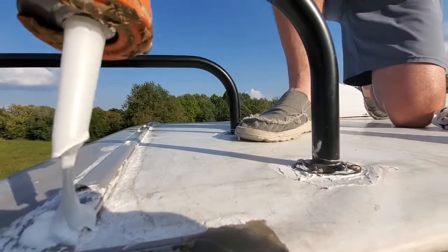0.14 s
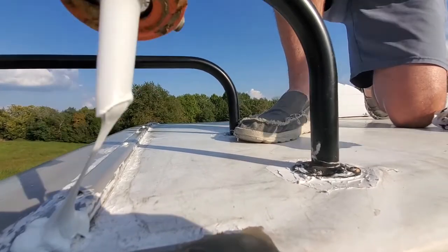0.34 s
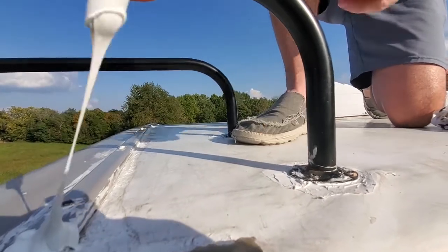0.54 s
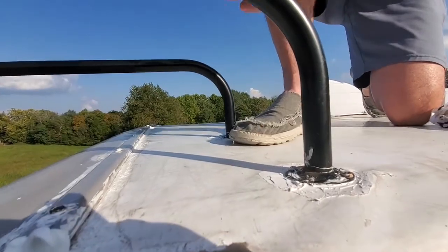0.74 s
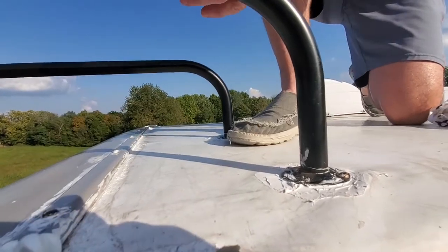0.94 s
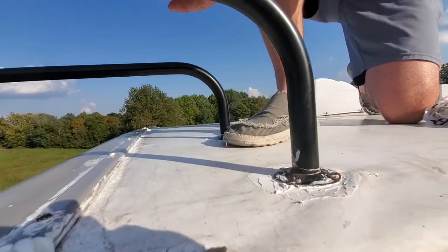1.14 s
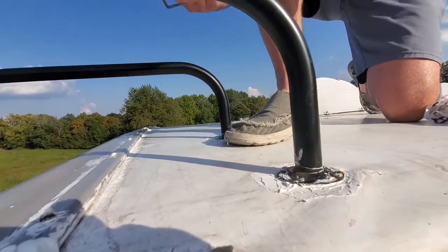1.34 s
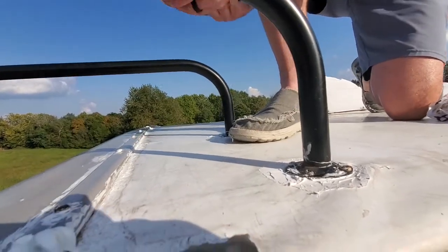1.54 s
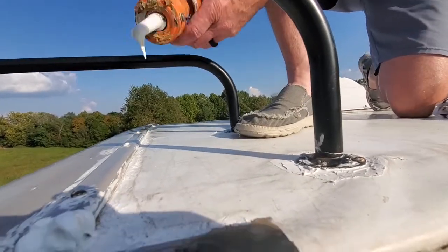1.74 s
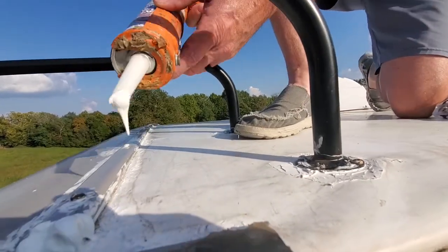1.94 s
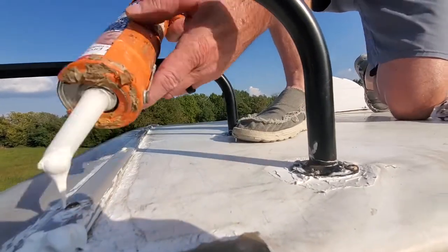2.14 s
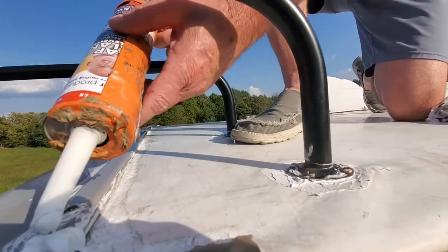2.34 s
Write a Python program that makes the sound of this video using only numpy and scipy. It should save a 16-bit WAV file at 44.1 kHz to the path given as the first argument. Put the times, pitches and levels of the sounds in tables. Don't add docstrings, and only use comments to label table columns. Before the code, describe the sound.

A caulking gun gives two quick metallic clicks close to the microphone, the hollow roof booming under the first; then cloth rubs, loose parts chatter and shoes knock the roof, over faint insects and a distant motor hum.

```python
import sys
import numpy as np
from scipy import signal
from scipy.fft import rfft, irfft, next_fast_len
from scipy.io import wavfile
from scipy.ndimage import uniform_filter1d, map_coordinates

SR = 44100
rng = np.random.default_rng(int(sys.argv[2]) if len(sys.argv) > 2 else 0)


def file_out(sig):
    cols = np.atleast_2d(sig).T
    lim = np.clip(cols, -1, 1)
    pcm = np.round(lim * 32767).astype(np.int16)
    wavfile.write(sys.argv[1], SR, pcm)


def boost_factor(decibels):
    exponent = np.asarray(decibels, float) / 20
    return 10 ** exponent


N = 105840
T = np.arange(N) / SR

# (frequency [Hz], level [dB], t60 [s])
ROOF_MODES = [(105, -12, .2), (172, -14, .2), (226, 0, .085), (262, -3, .1), (375, -12, .07)]
# (frequency [Hz], width [Hz], level [dB])
PANEL_MODES = [(488, 79, 2), (810, 129, 1.5), (1122, 150, -4), (1800, 235, -10), (2300, 210, -6.5),
               (3056, 220, -10), (4150, 190, -6), (6000, 350, -7.5)]
EVEN_DB = 0.5


def unit(x):
    return x / np.sqrt(np.mean(x ** 2) + 1e-20)


def along(points, hz):
    f, v = np.transpose(points)
    return np.interp(np.log(hz + 1), np.log(f + 1), v)


def curves(rows):
    s, *columns = np.transpose(rows)
    return [np.interp(T, s, column) for column in columns]


def wobble(rate):
    knots = rng.standard_normal(int(N * rate / SR) + 4)
    return map_coordinates(knots, [T * rate])


def filtered(x, response):
    n = x.shape[-1]
    m = next_fast_len(n + SR // 4)
    return irfft(rfft(x, m) * response(np.fft.rfftfreq(m, 1 / SR)), m)[..., :n]


def peaks(rows):
    def response(f):
        return sum((-1) ** k * boost_factor(db) * 1j * f * width / (hz * hz - f * f + 1j * f * width)
                   for k, (hz, width, db) in enumerate(rows))
    return response


def lowpass(width_hz):
    return lambda f: 1 / (1 + (f / width_hz) ** 2)


def pair(n, alike):
    a, b = rng.standard_normal((2, n))
    u = np.arccos(np.clip(alike, -1, 1)) / 2
    shared, apart = np.cos(u) * a, np.sin(u) * b
    return np.array([shared + apart, shared - apart])


def pan(db):
    return boost_factor([[db / 2], [-db / 2]])


def coloured(x, spectrum):
    return unit(filtered(x, lambda f: boost_factor(along(spectrum, f))))


def patchy(x, depth_db, wide, long):
    z = signal.stft(x, nperseg=512)[2]
    field = uniform_filter1d(rng.standard_normal(z.shape[1:]), size=wide, axis=0)
    field = uniform_filter1d(field, size=long, axis=1)
    return signal.istft(z * boost_factor(depth_db * unit(field)), nperseg=512)[1][:, :N]


def ring(modes, t, scatter_db, turns=1):
    y = 0
    for hz, db, t60 in modes:
        decay = boost_factor(db + scatter_db * rng.standard_normal() - 60 * t / t60)
        y = y + decay * np.sin(2 * np.pi * (hz * t + turns * rng.random()))
    return y / np.abs(y).max()


def later(y, lag_s):
    return np.array([y, np.pad(y, (round(lag_s * SR), 0))[:len(y)]])


def add(out, s, y):
    i = round(s * SR)
    out[:, i:i + y.shape[1]] += y[:, :out.shape[1] - i]


def motor():
    # (time [s], level [dB])
    hum_levels = [(0.0, -48.5), (0.02, -56), (0.95, -56.5), (1.2, -67.5), (1.24, -68), (1.32, -66),
                  (1.82, -64.5), (2.0, -55), (2.38, -62.5), (2.4, -70)]
    # (frequency [Hz], width [Hz], level [dB])
    drone_bands = [(52.7, 19, -64.5), (63, 35, -73.5), (78, 6.4, -62.5), (103.3, 19.5, -64.5),
                   (190.9, 14.8, -64), (281.5, 14, -73.5), (324, 16, -82.5)]
    # (frequency [Hz], density [dB per Hz])
    rumble_spectrum = [(12, -35), (28, -15), (49, -15), (118, -7.5), (157, -7), (203, -10.5), (292, -12.5),
                       (500, -37), (650, -78), (1100, -120)]
    level_db, = curves(hum_levels)
    level = np.sqrt(2) * boost_factor(level_db + 0.61 * wobble(7.25))
    hz = 123 + 1.31 * wobble(8.24)
    hum = level * np.sin(2 * np.pi * np.cumsum(hz) / SR)
    drones = np.zeros((2, N))
    for centre_hz, width_hz, db in drone_bands:
        resonance = peaks([(centre_hz, width_hz, 0)])
        drones += boost_factor(db) * unit(filtered(pair(N, 0.82), lambda f: resonance(f) ** 2))
    rumble = boost_factor(-65 + 1.0 * wobble(10.22)) * coloured(pair(N, 0.87), rumble_spectrum)
    return later(hum, 0.00015) + drones + rumble


def insects():
    # (time [s], level [dB])
    cricket_levels = [(0.0, -63.5), (0.79, -65), (1.1, -65), (1.48, -64.5), (2.4, -63)]
    # (frequency [Hz], density [dB per Hz])
    chorus_spectrum = [(5500, -42), (6500, -18), (7300, 5.5), (8000, -9), (9000, -3.5), (10000, -15.5),
                       (11500, -25)]
    # (frequency [Hz], density [dB per Hz])
    katydid_spectrum = [(9500, -32), (11000, -15.5), (12500, -5.5), (14000, -0.5), (15500, 1),
                        (16000, -8.5)]
    chirps_per_s, chirp_share, chirp_hz, arch_hz = 31.8, 0.61, 7852, 508
    level_db, = curves(cricket_levels)
    cycle = (0.3 + np.cumsum(chirps_per_s * (1 + 0.0209 * wobble(9))) / SR) % 1
    stroke = np.clip(cycle / chirp_share, 0, 1)
    hz = chirp_hz - arch_hz * (2 * stroke - 1) ** 2 + 70 * wobble(400)
    phase = 2 * np.pi * np.cumsum(hz) / SR
    flicker = boost_factor(2.2 * np.array([wobble(370), wobble(370)]))
    chirp = np.sin(np.pi * stroke) * flicker * np.sin([phase, phase + 1.5])
    chorus = coloured(pair(N, 0.098), chorus_spectrum) * boost_factor(2.0 * wobble(29.86))
    crickets = boost_factor(level_db) * pan(1.0) * (boost_factor(-0.5) * unit(chirp) + boost_factor(-0.5) * chorus)
    pulse_hz = 67 * (1 + 0.026 * wobble(6.8))
    pulse = 1 + 0.33 * np.sin(2 * np.pi * np.cumsum(pulse_hz) / SR)
    katydid_level = boost_factor(-63 + 0.6 * wobble(3.28))
    katydids = coloured(pair(N, 0), katydid_spectrum) * pulse * katydid_level * pan(11.5)
    return crickets + katydids


def air():
    # (frequency [Hz], density [dB per Hz])
    air_spectrum = [(210, -53), (350, -6), (530, -11.5), (2270, -25), (4650, -23), (5910, -18), (7630, -2),
                    (9850, -10), (15900, -11)]
    return boost_factor(-62.5) * pan(1.2) * coloured(patchy(pair(N, 0.2), 2.5, wide=5, long=16), air_spectrum)


def rubbing():
    # (time [s], effort [dB], roof coupling [dB])
    rub_strokes = [(0.0, -69.5, -2.5), (0.27, -84.5, 7), (0.4, -58.5, -1.5), (0.47, -70, 4),
                   (0.62, -72, 5.5), (0.79, -75, 8.5), (0.87, -80, 6.5), (0.9, -61, 4), (0.96, -58, -2.5),
                   (1.08, -55.5, -2), (1.18, -66.5, -2), (1.25, -53.5, -3.5), (1.38, -64.5, 4.5),
                   (1.47, -79.5, 9), (1.74, -90.5, 7), (2.02, -86, 8.5), (2.18, -69.5, -1.5),
                   (2.4, -78.5, 1)]
    # (frequency [Hz], density [dB per Hz])
    cloth_spectrum = [(530, -42), (900, -4.5), (1140, 0), (1390, -14), (1740, -7.5), (3450, -6.5),
                      (5910, -5), (15800, -13)]
    effort_db, coupling_db = curves(rub_strokes)
    grain = boost_factor(2 * wobble(300) + 1.5 * wobble(40))
    cloth = coloured(patchy(pair(N, 0.15), 2.5, wide=6, long=4) * grain, cloth_spectrum)
    scuff = unit(filtered(pair(N, 0.09) * grain, peaks(PANEL_MODES)))
    skin = peaks([(hz, 30, db) for hz, db, _ in ROOF_MODES])
    boom = unit(filtered(pair(N, 1.0), skin))
    through_roof = boost_factor(coupling_db) * (boost_factor(-1.5) * scuff + boost_factor(-1) * boom)
    return pan(2.1) * boost_factor(effort_db) * (boost_factor(0.5) * cloth + through_roof)


def swishes():
    # (start [s], length [s], level [dB], centre [Hz], left over right [dB])
    brushes = [
        (0, 0.081, -64.5, 2300, 10),
        (0.369, 0.075, -60.5, 6000, -3),
        (1.666, 0.098, -74, 5300, 4),
        (1.67, 0.1, -76.5, 3160, -4),
        (2.078, .12, -70.5, 1950, -11.5),
        (2.18, 0.16, -83, 4600, 17),
    ]
    octaves = 0.37
    out = np.zeros((2, N))
    for s, length, db, hz, pan_db in brushes:
        n = round(length * SR)
        bell = lambda f: np.exp(-0.5 * (np.log2((f + 1) / hz) / octaves) ** 2)
        grain = boost_factor(4 * wobble(89)[:n])
        brush = unit(filtered(pair(n, 0.057) * grain, bell))
        add(out, s, boost_factor(db) * pan(pan_db) * np.hanning(n) ** 0.6 * brush)
    return out


def whistles():
    # (start [s], length [s], level [dB], pitch [Hz])
    puffs = [
        (0.061, 0.059, -67.5, 810),
        (0.531, 0.074, -64.5, 761),
        (.71, 0.084, -68, 781),
        (2.185, 0.12, -64.5, 832),
    ]
    sag_hz_per_s, flutter_hz, steady = 685, 90, 1.25
    out = np.zeros((2, N))
    for s, length, db, hz in puffs:
        t = np.arange(round(length * SR)) / SR
        flutter = unit(filtered(pair(len(t), 0.093), lowpass(flutter_hz)))
        tone = np.sin(2 * np.pi * (hz - sag_hz_per_s * t / 2) * t)
        add(out, s, boost_factor(db) * np.hanning(len(t)) ** 0.16 * unit(flutter + steady) * tone)
    return out


def thump(t, db):
    boom = ring(ROOF_MODES, t, scatter_db=1.5, turns=0.15) * (1 - np.exp(-t / 0.0025))
    return later(boost_factor(db + 8) * boom, 0.0006)


def gun():
    # (time [s], peak [dB], roof thump [dB], rattle length [s])
    rod_clicks = [
        (0.2106, -19.5, -28, 0.003),
        (0.3162, -23.5, -44, 0.0031),
    ]
    # (frequency [Hz], first click [dB], second click [dB], t60 [s])
    frame_modes = [(749, -7, -11, 0.061), (910, -19, -20, 0.15), (1137, -0.5, 1, 0.039),
                   (1456, 4, -9.5, 0.026), (1582, -19.5, -32, 0.15), (1710, -13, -4, 0.028),
                   (2068, -6, -6.5, 0.04), (2390, 0, -2, 0.02), (2890, -32, -8, 0.036),
                   (3094, -2.5, -7.5, 0.038), (3370, -15, -19, 0.047), (4186, -6.5, -5.5, 0.043),
                   (644, -22, -11, 0.043), (8720, -22, -16.5, 0.076)]
    # (frequency [Hz], density [dB per Hz])
    rattle_spectrum = [(300, -63), (600, -13.5), (1200, 5.5), (1850, -18), (3100, -3), (3700, -8.5),
                       (5500, -9), (7500, -6.5), (10000, -9.5), (15800, -24.5)]
    rattle_t60, tail_t60 = 0.017, 0.24
    out, t = np.zeros((2, N)), np.arange(SR // 3) / SR
    for k, (s, db, thump_db, rattle_s) in enumerate(rod_clicks):
        shape = boost_factor(-60 * np.maximum(t - rattle_s, 0) / rattle_t60) * np.minimum(t / 0.00019, 1)
        rattle = 0.46 * coloured(pair(len(t), 0.071), rattle_spectrum) * shape
        modes = [(hz, levels[k], t60) for hz, *levels, t60 in frame_modes]
        frame = later(ring(modes, t, EVEN_DB) * (1 - np.exp(-t / 0.0014)), 0.00046)
        tail = unit(filtered(pair(len(t), 0.15), peaks(PANEL_MODES)))
        panel = boost_factor(-25 - 60 * t / tail_t60) * tail
        click = boost_factor(db) * pan(6) * (rattle + boost_factor(5) * frame + panel)
        add(out, s, click + thump(t, thump_db))
    return out


def knocks():
    # (time [s], tap [dB], roof thump [dB], snap [dB], pitch of the struck spot [Hz])
    contacts = [(.264, -53, -45.5, -78, 400), (.727, -58.5, -51.5, -61, 680), (0.885, -58.5, -60, -83, 860),
                (.914, -46.5, -58, -64, 590), (.947, -48.5, -53, -70, 1100), (0.988, -60, -68, -57, 1800),
                (1.029, -47.5, -49, -55, 1140), (1.066, -61, -55, -56, 4000), (1.23, -61, -30, -36, 1420),
                (1.324, -52, -54, -72, 2030), (1.351, -55, -42.5, -76, 300), (1.37, -46.5, -56, -49, 500),
                (1.385, -54, -47, -78, 400), (1.942, -58, -44, -69, 1210), (2.123, -63, -78, -78, 900)]
    # (frequency [Hz], density [dB per Hz])
    snap_spectrum = [(800, -12), (1700, -1.5), (3000, -3.5), (4200, -1.5), (6000, -6.5), (11000, -22),
                     (15000, -40)]
    puff_t60, attack_s, snap_t60, damping = 0.055, 0.0007, 0.025, 1.2
    out, t = np.zeros((2, N)), np.arange(SR // 3) / SR
    for s, db, thump_db, snap_db, spot_hz in contacts:
        puff = pair(len(t), 0.93) * boost_factor(-60 * t / puff_t60) * (1 - np.exp(-t / attack_s))
        spot = lambda f: f / (spot_hz + 1j * f * damping - f * f / spot_hz)
        tap = filtered(puff, lambda f: peaks(PANEL_MODES)(f) * spot(f) ** 2)
        tap = boost_factor(db) * tap / np.abs(tap).max()
        snap = boost_factor(snap_db - 0.5 - 60 * t / snap_t60) * coloured(pair(len(t), 0.35), snap_spectrum)
        add(out, s, pan(1.6) * (tap + snap) + thump(t, thump_db))
    return out


def chatter():
    # (start [s], length [s], level [dB], pitch [Hz])
    loose_parts = [(0.891, 0.028, -69, 4300), (.912, 0.022, -56.5, 1830), (.913, 0.014, -67, 4900),
                   (.948, .012, -71, 4250), (0.987, 0.018, -62, 1780), (0.999, 0.036, -57.5, 6400),
                   (1.007, 0.022, -56.5, 3100), (1.02, 0.038, -64, 1750), (1.029, 0.02, -63, 4150),
                   (1.03, 0.0084, -55, 6000), (1.063, .02, -56.5, 3850), (1.061, .013, -57.5, 6050),
                   (1.07, .016, -69, 2000), (1.1, 0.015, -65, 4000), (1.314, .02, -65, 1896),
                   (1.323, .025, -70, 2110), (1.035, 0.052, -51.5, 170), (1.109, 0.054, -69, 1100)]
    shake_hz = 110
    out = np.zeros((2, N))
    for s, length, db, hz in loose_parts:
        t = np.arange(round(length * SR)) / SR
        shake = 1 + 0.66 * unit(filtered(pair(len(t), 0.45), lowpass(shake_hz)))
        tone = np.sin(2 * np.pi * hz * t)
        add(out, s, boost_factor(db) * pan(2.8) * np.hanning(len(t)) ** 0.17 * shake * tone)
    return out


def heels():
    # (time [s], level [dB], attack [s], modes (frequency [Hz], level [dB], t60 [s]))
    blows = [
        (1.2298, -25.5, 0.0016, [(477, 2.5, 0.066), (357, 2.5, 0.058), (960, 4.5, .03), (1171, 5, 0.036), (1750, 2, 0.035), (2020, -13, .04)]),
        (1.3708, -28, 0.00061, [(302, 1, 0.027), (439, -1.5, 0.06), (497, -5, 0.037), (810, -8, 0.069), (904, -5, 0.091), (1110, -2.5, 0.051), (1720, -11, 0.041)]),
        (1.943, -36, 0.0019, [(306.7, -2, 0.37), (507, -3.5, .1), (606, -9, 0.068), (727, -7.5, 0.078), (845, 1, 0.057), (1020, -10.5, 0.085), (1390, -11, .03)]),
    ]
    out, t = np.zeros((2, N)), np.arange(SR // 2) / SR
    for s, db, attack_s, modes in blows:
        blow = ring(modes, t, EVEN_DB, turns=0.15) * (1 - np.exp(-t / attack_s))
        add(out, s, boost_factor(db) * pan(2.4) * later(blow, 0.00021))
    return out


def scene():
    distant = motor() + insects() + air()
    on_roof = rubbing() + swishes() + whistles() + gun() + knocks() + chatter() + heels()
    return distant + on_roof


def band_limit(x):
    return signal.sosfilt(signal.butter(12, 17020, fs=SR, output="sos"), x)


def record(dry):
    mix = filtered(dry, lambda f: f < 15900)
    return band_limit(mix)


dry = scene()
out = record(dry)
file_out(out)
```